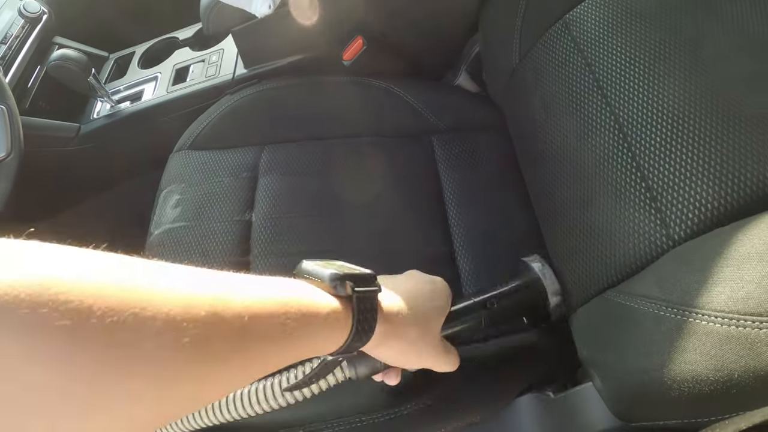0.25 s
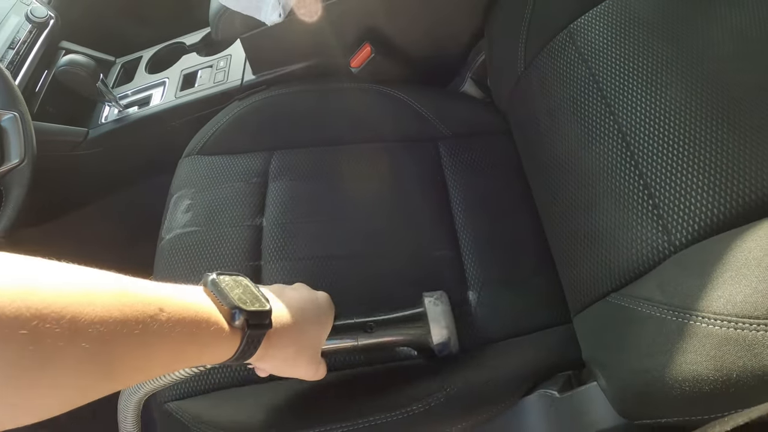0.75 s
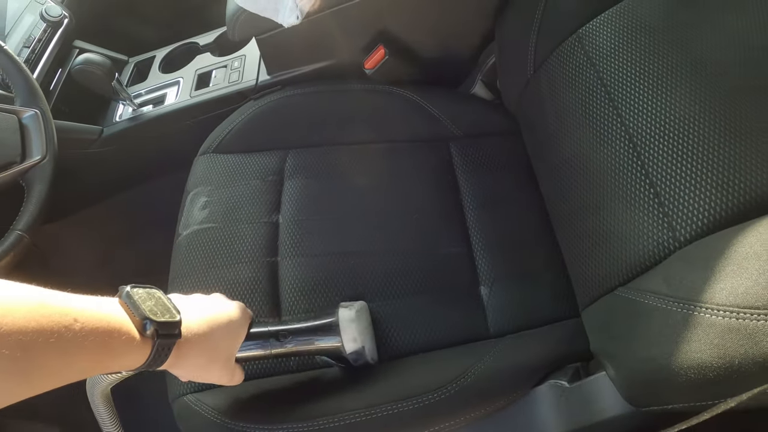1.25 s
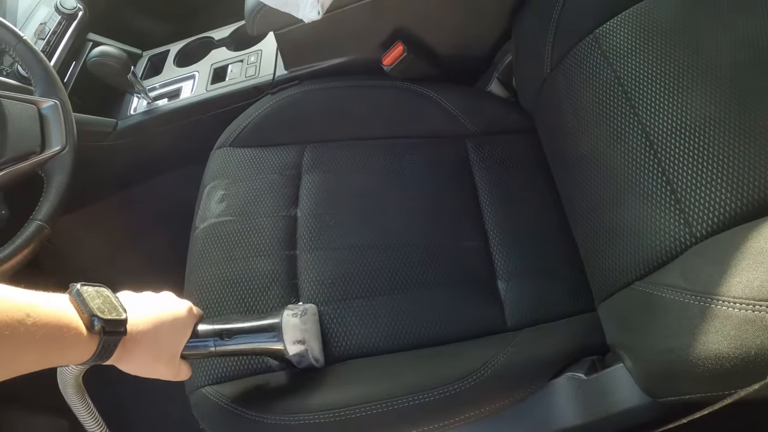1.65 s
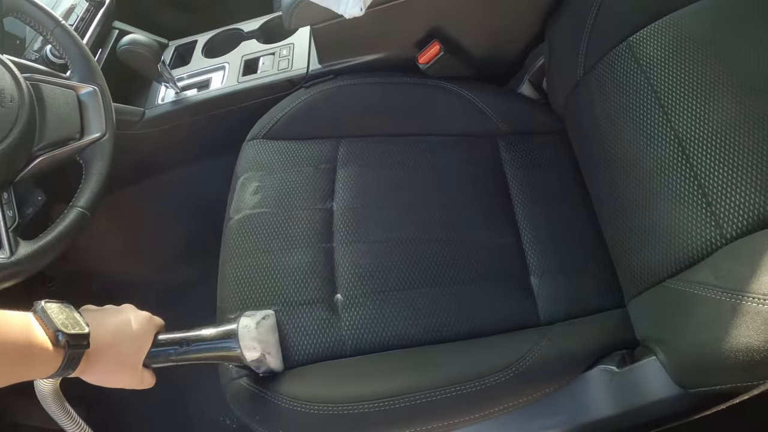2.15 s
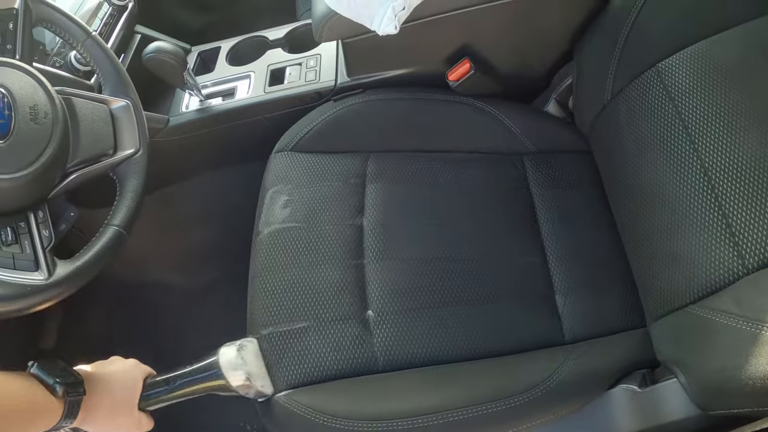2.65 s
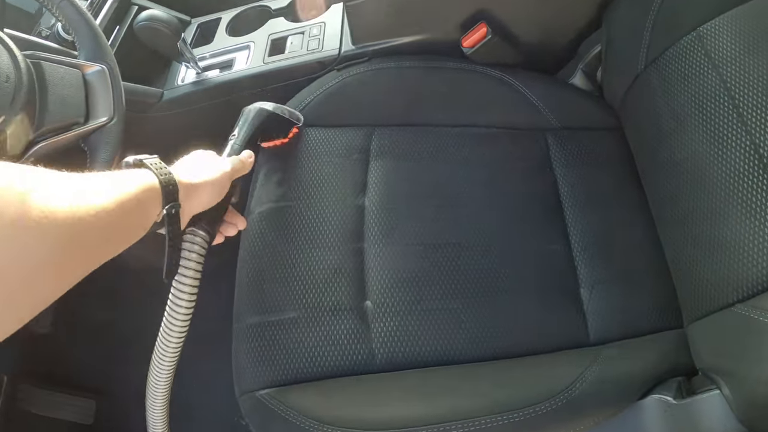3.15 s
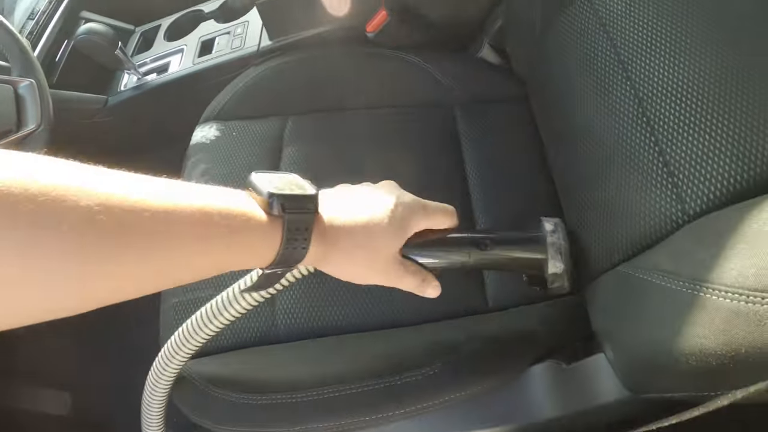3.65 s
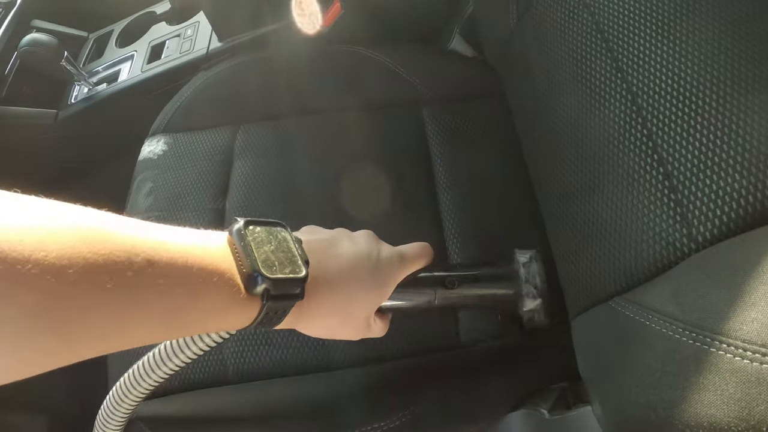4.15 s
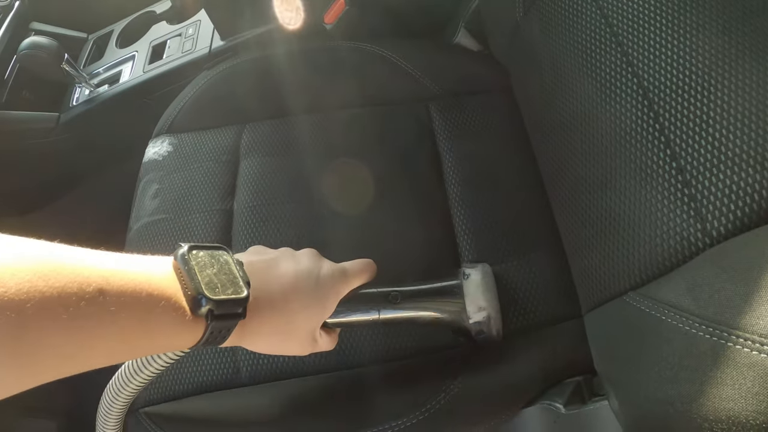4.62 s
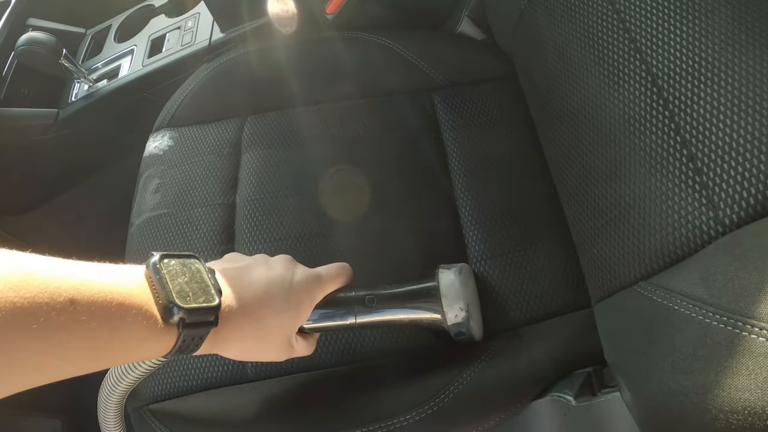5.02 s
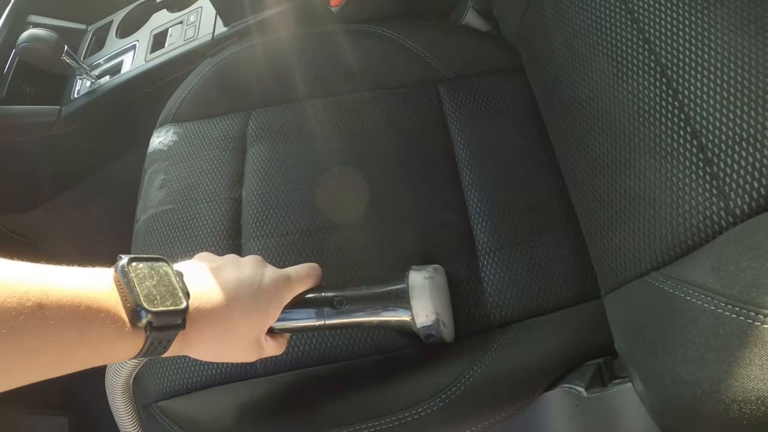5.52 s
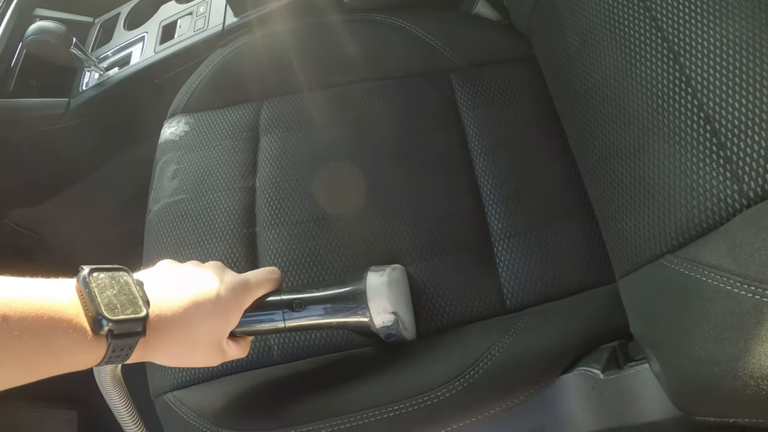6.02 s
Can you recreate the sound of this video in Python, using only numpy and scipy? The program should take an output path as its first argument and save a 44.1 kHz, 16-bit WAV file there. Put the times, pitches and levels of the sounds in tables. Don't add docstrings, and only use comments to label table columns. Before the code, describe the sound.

A continuous turbine whine with rushing air and fizzing droplets fills a close, dry car cabin. Light low puffs of wind and hose rumble open the first stroke; the hand tool then lifts off, the motor dips slightly, and it drops back with a clattering thump. The following stroke sounds more sealed and almost mono, with a small double bump near the end. Close handheld-style stereo microphone.

```python
import sys
import numpy as np
from scipy import signal
from scipy.io import wavfile
from scipy.ndimage import uniform_filter1d

SR = 44100
rng = np.random.default_rng(int(sys.argv[2]) if len(sys.argv) > 2 else 0)


def voltage_ratio(level):
    return 10 ** (np.asarray(level, float) / 20)


def file_out(sig):
    cols = np.atleast_2d(sig).T
    lim = np.clip(cols, -1, 1)
    pcm = np.round(lim * 32767).astype(np.int16)
    wavfile.write(sys.argv[1], SR, pcm)


N = 276934
SIDES = np.array([[.5], [-.5]])


def evened(x):
    return x / np.sqrt(np.mean(x ** 2) + 1e-20)


def bell(t, centre, half):
    return np.exp(-((t - centre) / half) ** 2)


def swells(events, t):
    return sum(db * bell(t, s, half) for s, db, half in events)


def read(points, hz):
    f, value = np.transpose(points)
    return np.interp(np.log(hz + 1), np.log(f + 1), value)


def columns(rows, t):
    s, *values = np.transpose(rows)
    return [np.interp(t, s, v) for v in values]


def wander(slow_hz, fast_hz, t):
    hz = np.geomspace(slow_hz, fast_hz, num=24)[:, None]
    sines = np.sin(2 * np.pi * (hz * t + rng.random(hz.shape)))
    return evened((sines / np.sqrt(hz)).sum(0))


def spectrum_grid(size):
    return np.fft.rfftfreq(size, 1 / SR), np.arange(N * 4 // size + 5) * size / 4 / SR


def sound(z):
    size = 2 * (z.shape[-2] - 1)
    return signal.istft(z, nperseg=size, noverlap=size * 3 // 4)[1][..., :N]


def share(db, hz, lo_hz, hi_hz):
    power = voltage_ratio(db) ** 2 * np.ones((len(hz), 1))
    return power / power[(hz > lo_hz) & (hz < hi_hz)].sum(0)


# (start time [s], blade rate [Hz])
LOAD = [(0.0, 1322.3), (0.311, 1355.2), (0.456, 1385.2), (0.631, 1364.0), (0.752, 1391.5), (0.874, 1385.7),
        (1.782, 1335.5), (1.799, 1384.7), (2.724, 1323.4), (3.261, 1353.5), (3.453, 1313.4),
        (3.753, 1316.8), (4.01, 1387.5), (4.423, 1384.1), (4.981, 1360.9), (5.189, 1383.2), (5.922, 1380.5)]


def blade_rate(t):
    start_hz, inertia_s = 1356, .248
    s, goal_hz = np.transpose(LOAD)
    keep = np.exp(-1 / (inertia_s * SR))
    goal_hz = goal_hz[np.searchsorted(s, np.arange(N) / SR, "right") - 1]
    hz = signal.lfilter([1 - keep], [1, -keep], goal_hz, zi=[keep * start_hz])[0]
    return np.interp(t, np.arange(N) / SR, uniform_filter1d(hz, size=2400, mode="nearest"))


# (multiple of blade rate, left minus right [dB], left lag [rad])
PORT_TONES = [(1, -3, .15), (2, 1, .5), (4, -1, .6), (8, 1, 1.6), (3, 1, .5), (11, 0, 2.1)]
# (level at full speed [dB], gain at deepest sag [dB], gain once the listener settles [dB])
OVERTONES = [(-56, 5, 6), (-63.5, -1, 0.5), (-63.5, -0.5, -18), (-68, 0, -2), (-75.5, 2.5, -10),
             (-89, 4, 6)]
# (time [s], multiple, level [dB], half
# length [s])
FADES = [(.1, 1, 0.5, 0.083), (1.22, 1, -2.5, 0.18), (2.25, 1, 1.5, 0.14), (2.62, 1, -1.5, 0.43),
         (3.1, 1, -1, 0.19), (3.3, 1, 1.5, 0.12), (3.962, 1, -6.5, 0.095), (4.247, 1, 4.5, 0.19),
         (.05, 2, -8, 0.092), (.42, 2, 5, 0.077), (.7, 2, -5, .12), (.98, 2, -3, .15),
         (1.597, 2, -12, 0.23), (2.65, 2, 4.5, 0.49), (3.52, 2, -11, 0.072), (4.05, 2, -11, 0.15),
         (5.09, 2, -5, 0.2), (0.73, 3, 11, .15), (3.0, 3, 5, 0.2), (.1, 3, 5, .12),
         (0.097, 4, 2.1, .07), (.48, 4, 3, .1), (1.25, 4, -11, 0.22), (2.2, 4, -3, .08),
                (2.854, 4, 3.5, 0.18), (3.45, 4, 3, 0.073), (3.67, 4, -18, 0.085), (6.1, 4, 4, .15),
                (.3, 8, 4.5, 0.064), (0.516, 8, -9, 0.087), (.9, 8, 4, 0.067), (1.22, 8, 4, .1),
                (2.2, 8, -8, .2), (2.57, 8, -7, 0.18), (2.95, 8, 5, 0.35), (3.43, 8, -6, .06),
                (3.72, 8, 2, .06), (4.2, 8, -8, 0.11), (5.18, 8, -13, 0.23), (5.8, 8, 5.5, 0.41),
                (1.1, 11, 7, .2), (2.0, 11, -4, .3), (3.3, 11, -6, .4), (2.55, 11, 10, .25),
                (4.5, 11, 2, .3), (5.5, 11, 1, .3)]


def turbine():
    full_hz, sag_hz = 1385, 60
    settle_s, settle_rise_s = 4.4, 0.1
    t = np.arange(N) / SR
    blade_hz = blade_rate(t)
    turns = np.cumsum(blade_hz) / SR
    sag = (full_hz - blade_hz) / sag_hz
    settled = .5 + .5 * np.tanh((t - settle_s) / settle_rise_s)
    coarse, out = t[::64], np.zeros((2, N))
    for (db, sag_db, late_db), (k, pan_db, lag) in zip(OVERTONES, PORT_TONES):
        level_db = db + sag * sag_db + settled * late_db
        own = [(s, change_db, half) for s, multiple, change_db, half in FADES
               if round(multiple) == k]
        level_db = level_db + swells(own, t)
        level_db += np.interp(t, coarse, .3 * k ** .75 * wander(2, 40, coarse))
        phase = 2 * np.pi * k * turns
        phase += np.interp(t, coarse, 0.051 * k ** 0.43 * wander(3.0, 30, coarse))
        tone = np.cos(phase - lag * SIDES) / np.cos(lag / 2)
        out += np.sqrt(2) * voltage_ratio(level_db + pan_db * SIDES) * tone
    return out


# (frequency [Hz], level [dB])
ROAR = [(30, -48), (200, -55), (380, -9), (480, -6.5), (900, 3), (1300, 6), (1550, -2.5), (2600, -4),
        (3600, -8.5), (6000, -20)]
# (frequency [Hz], level [dB])
JET = [(1500, -36), (2800, 0), (3500, -2.5), (4200, -4), (6000, 0.5), (7500, -10), (8500, -15),
       (11000, -18)]
# (frequency [Hz], level [dB])
FIZZ = [(5000, -13), (8000, -2.5), (9500, -0.5), (11500, -2.5), (12200, -6), (14000, -7), (15500, -33),
        (17000, 12)]
# (level [dB], share of the leak, change when lifted [dB], change on the second stroke [dB])
AIR_LAWS = [(-58.5, -0.16, -1.5, 0.46), (-54.5, 1.27, 1.2, 0.45), (-51, 0.29, -1.2, -5.5),
            (-65, 0.15, -0.6, -5)]
# (time [s], level [dB], slot whistle centre [Hz])
LEAK = [(0, 0.5, 2470), (.4, -1.5, 2330), (.9, 0, 2440), (1.05, 1, 2370), (1.75, 0.5, 2330), (2.1, 1, 2400),
        (2.6, 1, 2380), (2.8, 3.5, 2500), (3.0, 0.5, 2570), (3.45, -1, 2410), (3.8, -3, 2520),
        (3.96, -7.5, 2480), (4.25, -10, 2530), (4.7, -6.5, 2700), (5.3, -4.5, 2770), (5.6, -6.5, 2840),
        (5.95, -4.5, 2870), (6.28, -2, 2730)]
# (time [s], lift [0-1])
LIFTED = [(0, 0.6), (.3, 0.64), (.6, 0.1), (1.9, 0.02), (2.2, 0.32), (2.68, 0.6), (2.85, 0.97),
          (3.55, 0.67), (3.68, 0.3), (3.85, 0), (6.28, 0.16)]
# (time [s], lean [0-1])
SECOND = [(0, 0.35), (3.8, 0.66), (3.95, 1), (6.28, 0.73)]
# (time [s], roar [dB], jet [dB], fizz [dB], half length [s])
TIPS = [
    (2.88, -2, -1.5, -0.5, 0.11),
    (3.694, 0, 2, 0, 0.31),
    (4.147, -0.3, 0.5, -3.5, 0.27),
]
# (time [s], level [dB], half length [s])
SPLASHES = [(0.504, 2, 0.016), (0.68, 5, 0.018), (1.23, 1, .03), (1.77, 2.5, .025), (2.95, 0.5, .04),
            (3.393, -1.5, 0.034), (5.047, 3.5, 0.04), (5.65, 0.5, .1)]
# (frequency [Hz], width [Hz],
# level when sealed [dB], change when lifted [dB], change on the second stroke [dB])
CABIN = [(471, 51, -7.5, -4, -10), (522, 105, 7.5, -1, 4.5), (840, 650, 1.5, 4, 0),
         (1096, 86, -12.5, 3, -0.5), (1214, 74, 4.5, -3, -4.5), (1426, 175, -10, -1, 7),
         (3050, 150, -5, 2.5, 2), (3230, 210, 5.5, 1.5, 1), (4010, 400, 6, 2.5, -13),
         (4490, 180, 0.5, -1, 5.5), (5580, 340, 3, 2.5, -1.5), (6320, 390, 4, -5, -15),
         (6900, 300, 2.5, 7.5, 0), (8550, 440, 1, -3, 1.5), (9370, 490, 5, -1.5, -1),
         (10240, 320, 5.5, -1, -4.5), (11000, 580, 3, -3.5, 3.5), (11560, 200, 1, -1.5, 0),
         (2060, 200, 1.5, 0, -1), (2700, 120, 0, 0, 0.5), (3620, 260, -0.5, 2.5, -0.5),
         (5970, 290, 2.5, 3, -4), (7600, 400, 1, 0.5, 1.5), (15550, 500, -3, 1, -1)]
# (time [s], frequency [Hz], level [dB], half length [s])
BAND_SWELLS = [(0.62, 4800, 1, 0.68), (2.3, 4440, -3.5, 0.23), (1.35, 3400, 4.5, 0.42), (4.18, 3300, -4.5, 0.29),
               (2.8, 1250, 4.5, 0.63), (3.92, 1250, -4, 0.16), (2.07, 2320, 3.5, 0.32), (1.6, 6800, 2, .5),
               (4.4, 500, -4, 0.19), (2.54, 2630, 5, 0.15), (2.3, 3000, 4.5, .2), (1.9, 1200, -1, .2),
               (0.36, 3100, 1, 0.61), (2.5, 1860, 3.5, 0.32), (2.9, 4800, -1, .5), (3.2, 8200, -0.5, .6),
               (0.71, 6300, 1.5, .6), (4.15, 550, -3.5, .12), (3.05, 800, -4, 0.17), (3.7, 4300, 4, 0.11),
               (3.2, 6500, 2, 0.17), (3.2, 1800, -2, .4), (4.3, 710, 1.5, .12), (6.1, 6900, 1, .4),
               (5.2, 2200, -2.5, .5), (0.63, 2140, 3, .2), (2.79, 2600, 3, .07), (2.3, 2400, -1, .2),
               (1.1, 4300, 3, 0.33), (.1, 16000, -6, .3), (1.1, 15700, -6, .25), (3.4, 15400, -5, .45),
               (2.6, 11000, -1, 0.28), (1.4, 10800, -0.5, .4)]
# (time [s], frequency [Hz], half width [Hz], level [dB], half length [s])
GLINTS = [(.5, 3050, 70, -3, 0.6), (.5, 5270, 80, -8, .6), (.5, 4600, 150, 1, .5), (.5, 8900, 150, 8, .5),
          (.5, 13300, 350, 3, .6), (.5, 2460, 60, -3, 0.55), (1.6, 2920, 80, 4.5, .5),
          (1.6, 3170, 60, -5, .5), (1.6, 6800, 100, 3, .5), (1.6, 9000, 120, -2, .5),
          (1.6, 9750, 180, 3, .6), (1.7, 10600, 130, 7, .6), (1.8, 11600, 130, 4, 0.78),
          (2.25, 10300, 120, 7, .15), (2.9, 7300, 150, 7.5, 0.65), (5.2, 2920, 70, -5, 0.98),
          (5.2, 2650, 80, 0.5, 0.93), (5.2, 5660, 90, 4.5, 1.1), (5.2, 6000, 100, -7, 1.2),
          (5.2, 6270, 80, 5, 1.3), (5.2, 10300, 150, -2, 1.2), (5.3, 10560, 180, 2.5, 1),
          (5.7, 11500, 150, 4, 0.44), (5.2, 13250, 250, 2.5, 1.2)]
# (frequency [Hz], likeness [-1 to 1])
SAME = [(60, .95), (500, .99), (1300, .993), (1900, .95), (4000, .89), (8000, .73), (13000, .5)]
# (frequency [Hz], lead [rad])
LEAD = [(60, 0), (700, -.23), (1600, -.3), (2300, -.75), (3300, -.5), (5000, -.75), (8000, -.95),
        (13000, -1.3), (16000, -2.2)]
# (frequency [Hz], level [dB])
TILT = [(60, -2), (150, 5), (380, -0.5), (950, 1.5), (2380, 1.5), (5980, 2), (15000, -2)]


def air():
    hz, t = spectrum_grid(size=1024)
    f = hz[:, None]
    leak_db, slot_hz = columns(LEAK, t)
    lifted, second = columns(LIFTED, t)[0], columns(SECOND, t)[0]
    roar_db, slot_db, jet_db, fizz_db = (
        db + part * leak_db + lifted * up_db + second * lean_db for db, part, up_db, lean_db in AIR_LAWS)
    tip_db = sum(np.outer(dbs, bell(t, s, half)) for s, *dbs, half in TIPS)
    roar_db, jet_db, fizz_db = np.array([roar_db, jet_db, fizz_db]) + tip_db

    cabin_db = sum((db + lifted * up_db + second * lean_db) / (1 + (2 * (f - at_hz) / width) ** 2)
                   for at_hz, width, db, up_db, lean_db in CABIN)
    cabin_db += 4.9 / (1 + ((f - 8 * blade_rate(t)) / 63.0) ** 2)
    cabin_db += sum(db * bell(t, s, half) * bell(f, at_hz, 0.088 * at_hz) for s, at_hz, db, half in BAND_SWELLS)
    cabin_db += sum(db * bell(t, s, half) * bell(f, at_hz, half_hz)
                    for s, at_hz, half_hz, db, half in GLINTS)

    slot = -10 * np.log10(1 + ((f - slot_hz) / 310.0) ** 4)
    splash_db = 0.31 * wander(3.0, 30, t) + swells(SPLASHES, t)
    jet_db = jet_db - 1.16 + 0.53 * splash_db
    fizz_db = fizz_db - 2.0 + splash_db
    power = voltage_ratio(roar_db) ** 2 * share(read(ROAR, f) + cabin_db, hz, 350, 989)
    power += voltage_ratio(slot_db - 1.0) ** 2 * share(slot + cabin_db, hz, 1500, 2920)
    power += voltage_ratio(jet_db) ** 2 * share(read(JET, f) + cabin_db, hz, 4060, 8500)
    power += voltage_ratio(fizz_db) ** 2 * share(read(FIZZ, f) + cabin_db, hz, 11590, 15000)

    a, b, c, d, patches, bands = rng.standard_normal((len(t), len(hz), 6)).T
    patches = evened(uniform_filter1d(uniform_filter1d(patches, size=12, axis=0), size=14, axis=1))
    bands = evened(uniform_filter1d(uniform_filter1d(bands, size=5, axis=0), size=120, axis=1))
    level = np.sqrt(power) * voltage_ratio(0.38 * patches + .6 * bands)

    same = np.clip(read(SAME, f), -1, 1)
    left = a + 1j * b
    right = same * left + np.sqrt(1 - same ** 2) * (c + 1j * d)
    port = voltage_ratio(read(TILT, f) / 2) * np.exp(.5j * read(LEAD, f))
    return 1.213 * sound(np.array([left * port, right / port]) * level)


# (time [s], peak level [dB], thump frequency [Hz], left minus right [dB], knock level [dB])
BUMPS = [
    (2.709, -63, 95, 2.1, -29),
    (2.752, -54, 142, 1, -1),
    (3.452, -68, 95, 5, -10),
    (3.712, -55, 101, 18, -9),
    (3.927, -65, 45, -6, -14),
    (5.966, -55, 110, 1, 0),
    (5.98, -55, 173, .3, -1),
]


def bumps():
    t, out = np.arange(SR // 4) / SR, np.zeros((2, N))
    rise = np.minimum(t / .0015, 1)
    for s, db, hz, pan_db, knock_db in BUMPS:
        t60 = 7.6 / hz
        thump = np.sin(2 * np.pi * hz * t) * voltage_ratio(-60 * t / t60) * np.minimum(t / 0.0072, 1)
        knock = sum(np.sin(2 * np.pi * f * t) * voltage_ratio(-60 * t / d)
                    for f, d in [(360, 0.049), (620, 0.021), (900, 0.035)])
        noise = rng.standard_normal((2, len(t)))
        puff = evened(signal.lfilter(*signal.butter(2, 600., fs=SR), noise))
        puff *= voltage_ratio(-35.0 - 60 * t / 0.23)
        hit = voltage_ratio(db) * (thump + voltage_ratio(knock_db) * (knock + puff) * rise)
        at = round(s * SR)
        out[:, at:at + len(t)] += (voltage_ratio(pan_db * SIDES) * hit)[:, :N - at]
    return out


# (time [s], peak level [dB], left ring [Hz], right ring [Hz], left minus right [dB])
KNOCKS = [(2.748, -53, 420, 420, 0), (3.7115, -36, 696, 760, -10), (3.712, -36, 1000, 600, -1),
          (3.712, -36, 388, 474, -2), (3.73, -47, 520, 563, -3), (3.723, -43, 287, 230, 3),
          (3.915, -48.5, 267, 235, -11), (3.917, -51, 480, 430, -3), (3.934, -58, 201, 170, -1),
          (5.965, -58, 260, 259, .1)]


def knocks():
    t, out = np.arange(SR // 8) / SR, np.zeros((2, N))
    rise = np.minimum(t / .002, 1)
    for s, db, left_hz, right_hz, pan_db in KNOCKS:
        t60 = 14 / left_hz
        turns = np.outer([left_hz, right_hz], t)
        overtone = 0.5 * np.sin(2 * np.pi * 2.27 * turns) * voltage_ratio(-90 * t / t60)
        ring = np.sin(2 * np.pi * turns) + overtone
        at = round(s * SR)
        out[:, at:at + len(t)] += voltage_ratio(db + pan_db * SIDES - 60 * t / t60) * ring * rise
    return out


# (frequency [Hz], level [dB])
HOSE = [(20, -27), (60, -11), (100, -1), (150, -2), (250, 1.5), (400, 10.5), (600, -20)]
# (time [s], level [dB], half length [s])
DRAGS = [(0, 9, 0.38), (.7, 2.5, 0.52), (1.2, -3, .2), (2.5, -3, 0.16), (3.203, 2, 0.22), (3.75, 9, 0.21),
         (4.2, 1, 0.14), (5.3, -3, .2), (5.75, 0.5, .15), (6.04, 7, 0.05), (2.95, 0, 0.2)]


def hose():
    rest_db, lift_db = -82, 7
    hz, t = spectrum_grid(size=2048)
    a, b = rng.standard_normal((len(t), len(hz), 2)).T
    level_db = rest_db + lift_db * columns(LIFTED, t)[0] + swells(DRAGS, t)
    level_db += 2.4 * wander(2, 12, t)
    colour = np.sqrt(share(read(HOSE, hz[:, None]), hz, 120, 350))
    return 0.9 * sound((a + 1j * b) * colour * voltage_ratio(level_db))


# (frequency [Hz], level [dB])
GUST = [(20, -26), (45, -8), (80, -1), (150, 0), (250, -9), (500, -28), (1200, -50)]
# (time [s], peak level [dB], half length [s], left minus right [dB],
# tilt about 80 Hz [dB per octave])
GUSTS = [(.04, -73, 0.04, 14, -10), (.16, -67.5, 0.08, 3, 1), (0.227, -64.5, 0.021, 20, 0.5),
         (0.36, -71.5, .03, 22, -6), (0.423, -68, .018, 20, -9), (.475, -67.5, .02, 23, 1),
         (0.513, -78, .04, 17, -2), (0.54, -70, 0.014, 21, 3), (.69, -81, 0.048, 2, -3),
         (0.8, -73, 0.056, 9, -4), (.92, -84, 0.053, 5, -3), (1.43, -79, 0.045, 10.5, -5),
         (1.64, -78, 0.045, 18, -3), (1.755, -80, 0.046, 7, -8), (1.91, -84, .07, 3, -6),
         (2.137, -91, 0.04, 9, -8), (3.78, -76, 0.037, -5, 4.5), (3.922, -81, 0.16, -3, 5),
         (4.28, -90, .08, 2, 0), (4.52, -89, .06, 2, -4), (4.85, -87, .06, 2, -4), (5.1, -93, .06, 3, -5),
         (5.6, -95, .15, 3, 2), (6.27, -75.5, 0.066, 14, -8)]


def wind():
    calm_power, calm_tilt_db = voltage_ratio(-94.5) ** 2, 6.5
    hz, t = spectrum_grid(size=2048)
    f = hz[:, None]
    power = np.array([voltage_ratio(db) ** 2 * bell(t, s, half) for s, db, half, _, _ in GUSTS])
    total = power.sum(0) + calm_power
    pan_db, tilt_db = np.transpose(GUSTS)[3:] @ power / total
    level_db = 10 * np.log10(total)
    tilt_db = tilt_db + calm_tilt_db * calm_power / total
    colour_db = read(GUST, f) + tilt_db * np.log2((f + 10) / 80)
    a, b = rng.standard_normal((len(t), len(hz), 2, 2)).T
    gain = voltage_ratio(level_db + 4.5 + SIDES * pan_db)[:, None]
    gusts = 0.73 * sound((a + 1j * b) * np.sqrt(share(colour_db, hz, 25, 220)) * gain)
    fine = np.arange(0, N, 64) / SR
    flutter = [np.interp(np.arange(N) / SR, fine, voltage_ratio(1.5 * wander(5.4, 25, fine))) for port in gusts]
    return gusts * flutter


def scene():
    return turbine() + air() + bumps() + knocks() + hose() + wind()


def band_limit(x):
    return signal.sosfilt(signal.butter(12, 15770, fs=SR, output="sos"), x)


# (time [s], width [0-1])
WIDTH = [
    (0, 1),
    (3.74, 0.89),
    (3.9, 0.6),
    (4.1, 0.01),
    (5.3, 0),
    (5.6, 0.42),
    (6.28, 0.6),
]


def record(dry):
    mid, side = (dry[0] + dry[1]) / 2, (dry[0] - dry[1]) / 2
    bass, low = (signal.sosfiltfilt(signal.butter(4, edge_hz, fs=SR, output="sos"), side)
                 for edge_hz in (500., 1650.))
    width = np.clip(columns(WIDTH, np.arange(N) / SR)[0], 0, 1)
    side = bass * (0.3 + 0.55 * width) + (low - bass) * width ** 2 + (side - low) * width
    edge = signal.firwin(511, 15760, window=("kaiser", 8), fs=SR)
    mix = signal.oaconvolve(np.array([mid + side, mid - side]), edge[None], "same")
    return band_limit(mix)


dry = scene()
out = record(dry)
file_out(out)
```